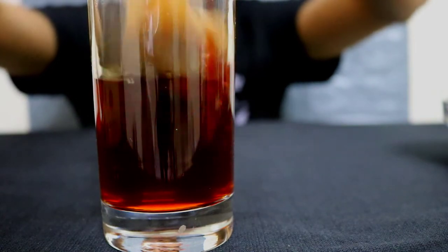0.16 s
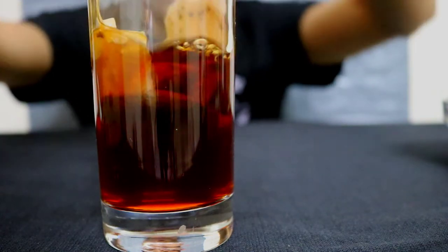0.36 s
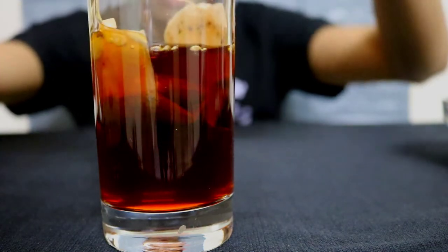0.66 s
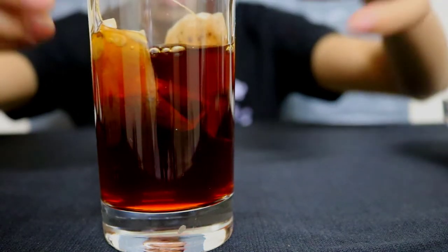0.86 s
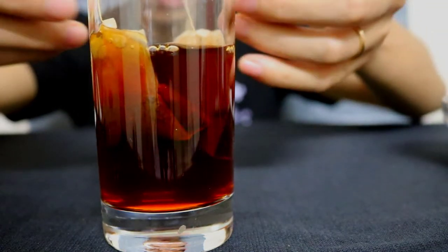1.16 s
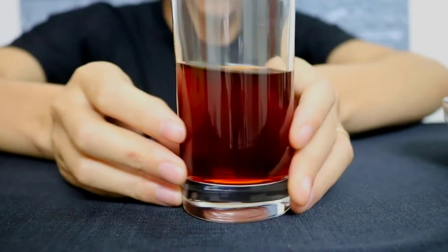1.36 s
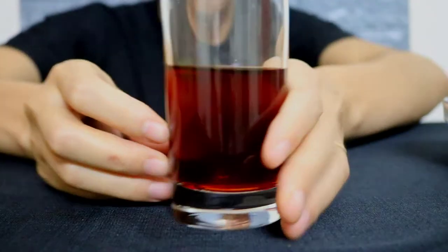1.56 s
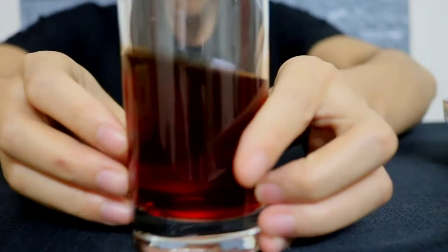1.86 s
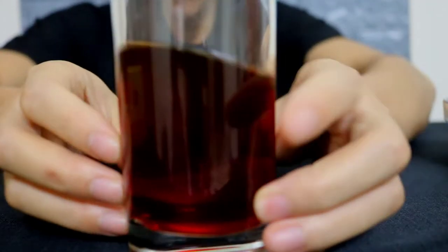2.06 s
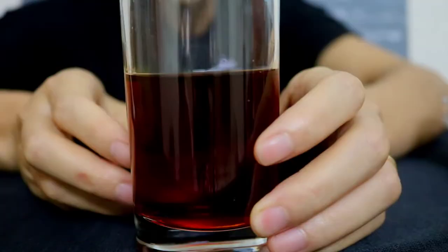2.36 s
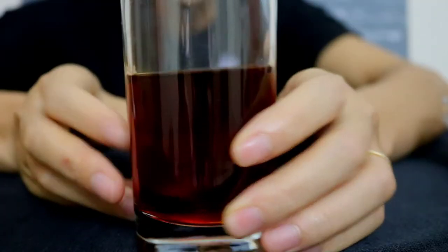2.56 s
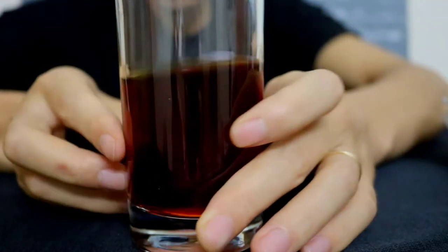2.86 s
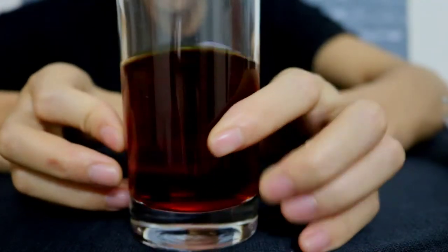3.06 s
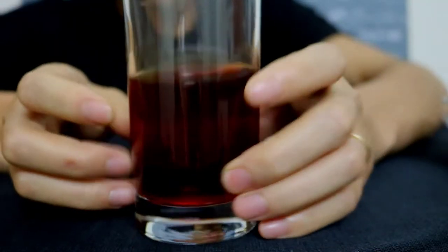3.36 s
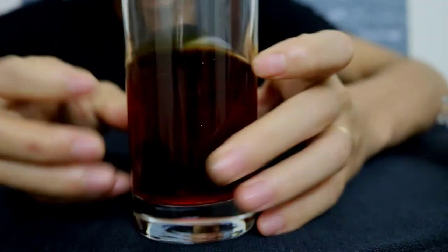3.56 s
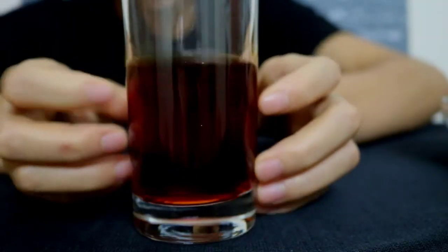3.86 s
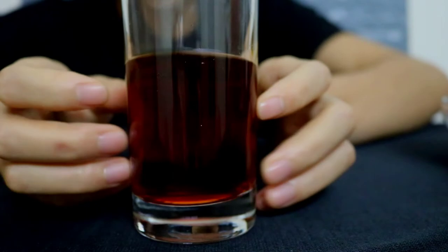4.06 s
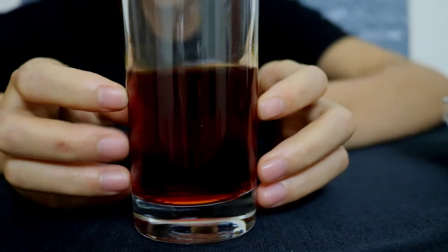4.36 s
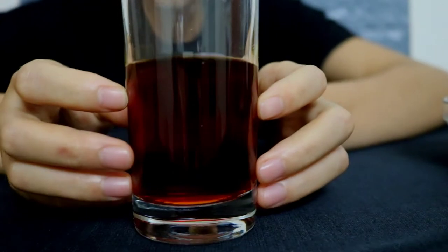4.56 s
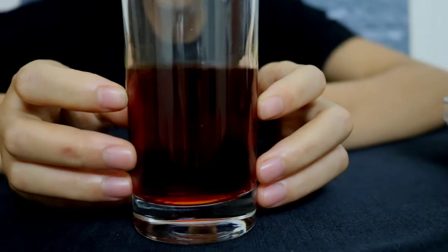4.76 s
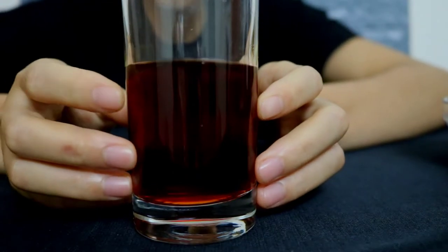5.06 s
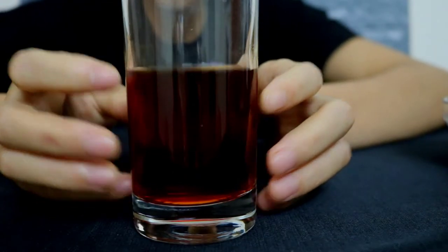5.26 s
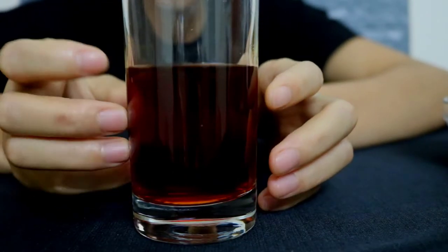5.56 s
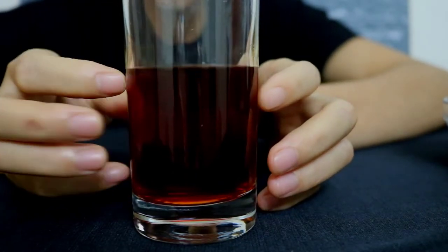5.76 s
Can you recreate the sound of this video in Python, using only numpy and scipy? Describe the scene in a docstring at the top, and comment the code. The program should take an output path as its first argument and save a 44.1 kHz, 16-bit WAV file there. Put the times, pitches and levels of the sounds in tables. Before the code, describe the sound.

Close up in a quiet kitchen, wet tea bags and fingers tick faintly against a tall full glass. The glass rubs across cloth, then one tap rings clearly. After a short total silence come soft rubbing, a heavy knock on the covered table with a cluster of glassy clinks, near quiet, and one last bright tap.

```python
"""A tall glass of tea rings as fingers tap its wall, close to the microphone in a quiet kitchen.
Each ring is a set of fading sine waves. The heavy foot knocks on a covered table: a filtered thud and low ring.
The glass slides over the cloth (dense tiny clicks); wet tea bags and fingernails tick, and soft brushes,
swells and bumps come and go (short bursts of noise). Kitchen air is filtered noise; a faint room tail follows.
The sound cuts out briefly twice and once for longer."""
import sys
import numpy as np
from scipy import signal
from scipy.fft import rfft, irfft
from scipy.io import wavfile
from scipy.ndimage import uniform_filter1d

SR = 44100
rng = np.random.default_rng(int(sys.argv[2]) if len(sys.argv) > 2 else 0)


def inscribe(sig):
    """Save sig as 16-bit PCM at rate SR to the path in sys.argv[1].

    A 1-D sig is mono; a 2-D sig holds one channel per row.
    Samples are clipped to [-1, 1] before scaling.
    """
    pcm = np.round(np.clip(np.atleast_2d(sig).T, -1, 1) * 32767)
    wavfile.write(sys.argv[1], SR, pcm.astype(np.int16))


N = 260612
TIME = np.arange(N) / SR


def undb(db):
    """Turn decibels into a gain."""
    return 10 ** (np.asarray(db) / 20)


def unit(x):
    """Scale a sound to an average (rms) level of 1."""
    return x / np.sqrt(np.mean(x ** 2))


def fader(rows):
    """Draw a gain over time through rows of (time [s], level [dB])."""
    return undb(np.interp(TIME, *np.transpose(rows)))


def fade(t, t60):
    """Natural dying away: the level falls by 60 dB in t60 seconds."""
    return np.exp(-np.log(1000) * t / t60)


def add(out, s, x):
    """Mix sound x into out, starting at time s."""
    start = max(int(round(s * SR)), 0)
    out[start:start + len(x)] += x[:max(N - start, 0)]


def colour(x, points):
    """Shape the tone through (frequency [Hz], level [dB]) points, with no sound before its cause."""
    size = 4096
    hz, db = np.transpose(points)
    freq = np.maximum(np.arange(size // 2 + 1) * SR / size, 1)
    gain = undb(np.interp(np.log(freq), np.log(hz), db))
    # folding the cepstrum gives the minimum-phase filter
    cepstrum = irfft(np.log(gain))
    cepstrum[1:size // 2] *= 2
    cepstrum[size // 2 + 1:] = 0
    response = irfft(np.exp(rfft(cepstrum)))
    return signal.fftconvolve(x, response)[:len(x)]


def band_noise(count, hz, width_hz):
    """Noise gathered around one frequency, as in a single resonance, with rms 1."""
    freq = np.maximum(np.arange(count // 2 + 1) * SR / count, 1)
    gain = 1 / (1 + ((freq ** 2 - hz ** 2) / (freq * width_hz)) ** 2)
    return unit(irfft(rfft(rng.standard_normal(count)) * gain, count))


def walk(rate):
    """Slow random wavering (rms 1): noise averaged twice over 1/rate seconds."""
    span = max(int(SR / rate), 1)
    return unit(uniform_filter1d(uniform_filter1d(rng.standard_normal(N), span), span))


# tone of the kitchen air before and after the long silence: (frequency [Hz], relative level [dB])
AIR_EARLY = [(15, -40.5), (25, -17.5), (92, -13.5), (145, -3.5), (293, 0.5), (354, -3), (887, -8),
             (988, -9), (1560, -11.5), (3720, -18.5), (11000, -18.5), (16000, -22.5)]
AIR_LATE = [(15, -54), (25, -34), (185, -3.5), (335, -1.5), (451, -7.5), (1650, -16.5), (2160, -18.5),
            (3080, -24.5), (3620, -23.5), (7110, -32), (7920, -18), (8590, -27), (16000, -27)]
# loudness of the kitchen air: (time [s], level [dB])
AIR_DB = [(0, -57.6), (2.4, -55.5), (2.8, -53), (5.9, -54.5)]
# thin whistle in the hiss: (frequency [Hz], width [Hz], level [dB])
WHISTLE = [(7970, 140, -71.5), (3720, 66, -74.5)]


def air():
    """Low room murmur under an even hiss; a thin whistle joins after the long silence."""
    early = unit(colour(rng.standard_normal(N), AIR_EARLY))
    late = unit(colour(rng.standard_normal(N), AIR_LATE))
    is_late = TIME > SILENCES[-1][0]  # the switch hides in the long silence
    waver = undb(.4 * walk(8))
    murmur = np.where(is_late, late, early) * fader(AIR_DB) * waver
    whistle = sum(undb(db) * band_noise(N, hz, width) for hz, width, db in WHISTLE)
    return murmur + whistle * is_late


ROOM_T60_S, ROOM_DB = 0.44, -13.5
# tone of the room tail: (frequency [Hz], relative level [dB])
ROOM = [(100, -3), (250, 4.5), (600, -5.5), (1500, -9), (5000, -2), (12000, -1)]


def room(x, onset_s=0.0016):
    """A faint tail from the kitchen walls, fullest in the lows and open in the treble: dying noise."""
    t = TIME[:SR // 2]
    tail = rng.standard_normal(len(t)) * fade(t, ROOM_T60_S) * (1 - np.exp(-t / onset_s))
    tail = colour(tail / np.sqrt(np.sum(tail ** 2)), ROOM)
    return undb(ROOM_DB) * signal.fftconvolve(x, tail)[:N]


def swells(rows, spread):
    """Soft sounds that rise and fade without an attack: noise under a smooth hump."""
    out = np.zeros(N)
    for s, half_length, db, hz in rows:
        count = int(2 * half_length * SR)
        hump = np.hanning(count) * band_noise(count, hz, spread * hz)
        add(out, s - half_length, undb(db) * hump)
    return out


# soft puffs of noise, light brushes and low swells of room murmur:
# (middle time [s], half length [s], level [dB], centre frequency [Hz])
PUFFS = [(.06, 0.085, -60.5, 1100), (.77, .05, -63.5, 1800), (.91, .02, -56, 10100),
         (.915, .03, -57.5, 650), (1.228, .027, -53.5, 10000), (2.048, 0.049, -52.5, 2320),
         (2.29, .12, -55.5, 520), (3.3, 0.079, -52, 1500), (5.25, .12, -53.5, 280),
         (5.758, .028, -55.5, 2800)]


def puffs():
    """Soft puffs of broad noise: light brushes and low swells of room murmur."""
    return swells(PUFFS, spread=1.33)


# arms leaning on the table: (middle time [s], level [dB], centre frequency [Hz])
LEANS = [(.25, -63, 45), (.82, -64.5, 48), (4.45, -57, 107)]
LEAN_HALF_S = 0.095
# soft low bumps of finger pads and the table: (middle time [s], level [dB])
SOFT_BUMPS = [(.19, -51), (1.73, -55), (1.79, -57.5), (1.98, -54.5), (2.972, -57), (3.47, -58), (3.59, -58),
              (4.895, -57), (5.331, -56), (5.6, -54)]
SOFT_BUMP_HZ, SOFT_BUMP_HALF_S = 142, .024
# the table sways for a moment after each tap's thump (dB against the thump)
SWAY_DB, SWAY_HZ, SWAY_HALF_S, SWAY_LAG_S = -29, 135, .019, .012


def bumps():
    """Dull low bumps: arms lean, finger pads and the table bump softly, the table sways after each tap."""
    leans = [(s, LEAN_HALF_S, db, hz) for s, db, hz in LEANS]
    soft = [(s, SOFT_BUMP_HALF_S, db, SOFT_BUMP_HZ) for s, db in SOFT_BUMPS]
    sways = [(s + SWAY_LAG_S, SWAY_HALF_S, thump_db + SWAY_DB, SWAY_HZ) for s, *_, thump_db in TAPS]
    return swells(leans + soft + sways, spread=0.58)


# tone of the sliding tablecloth: (frequency [Hz], relative level [dB])
CLOTH = [(59, -40), (100, -20), (229, -5.5), (365, -11.5), (502, -3), (1060, -10), (1680, -4), (1830, -6.5),
         (6700, -8), (12700, -14), (16000, -40.5)]
# pushes and turns of the glass on the cloth: (start time [s], hold until [s], level [dB])
STROKES = [(1.256, 1.33, -57.5), (1.4, 1.555, -45.2), (1.829, 1.87, -60), (2.75, 3.13, -58.5),
           (3.24, 3.436, -61), (3.49, 3.68, -56.8), (3.736, 3.88, -61), (5.267, 5.37, -62)]
STROKE_ATTACK_S, STROKE_RELEASE_S = .055, .115
# a faint, steady, cloth-coloured hiss lies under everything from here on
HISS_FROM_S, HISS_DB = 1.28, -66


def sliding():
    """Threads of the cloth catch and slip under the foot: very dense tiny clicks, over a faint steady hiss."""
    # slips differ slightly in strength, so the rub stays smooth
    slips = rng.standard_normal(N) * undb(1.1 * rng.exponential(size=N))
    rub = unit(colour(slips, CLOTH))
    judder = undb(.5 * walk(70))  # slightly uneven speed
    strokes = []
    for start, end, db in STROKES:
        gather = (TIME - start) / STROKE_ATTACK_S
        ease_off = 1 - (TIME - end) / STROKE_RELEASE_S
        strokes.append(undb(db) * np.clip(np.minimum(gather, ease_off), 0, 1))
    speed = np.max(strokes, axis=0)
    hiss = undb(HISS_DB) * (TIME > HISS_FROM_S)
    return rub * judder * (speed + hiss)


# short ticks, and one faint high glass ping at .179 s:
# (time [s], starting level [dB], centre frequency [Hz], time to fall 60 dB [s])
TICKS = [(.066, -37, 12300, .0055), (.072, -52, 7500, .012), (.101, -42.5, 11000, .048),
         (.179, -53, 8950, .072), (.29, -51, 11300, .04), (.987, -43.5, 1870, 0.011),
         (1.115, -36.5, 9100, .013), (1.116, -39, 1910, 0.016)]
# every tap starts with a click, just before the wall speaks
CLICK_HZ, CLICK_T60_S, CLICK_LEAD_S = 5500, 0.0093, .0007
# the heavy foot adds a hollow clack (dB against the thump)
CLACK_DB, CLACK_HZ, CLACK_T60_S = -19, 950, .04


def ticks(spread=1.0):
    """Ticks of wet paper and fingernails, a faint glass ping, each tap's click and clack: fast-dying noise."""
    out, t = np.zeros(N), TIME[:SR // 5]
    clicks = [(s - CLICK_LEAD_S, click_db, CLICK_HZ, CLICK_T60_S) for s, *_, click_db, thump_db in TAPS]
    clacks = [(s, thump_db + CLACK_DB, CLACK_HZ, CLACK_T60_S) for s, *_, thump_db in TAPS]
    for s, db, hz, t60 in TICKS + clicks + clacks:
        add(out, s, undb(db) * band_noise(len(t), hz, spread * hz) * fade(t, t60))
    return out


# knocks of the foot on the table:
# (time [s], level before cushioning [dB], contact corner [Hz], share of the low ring [dB])
KNOCKS = [(.576, -49, 1500, -11), (.905, -39, 900, 7), (1.115, -28, 1600, -14), (3.732, -6.5, 360, 8),
          (3.775, -21, 350, 10), (3.7969, -21, 350, 15), (4.1367, 1.5, 680, -10)]
# tone of the covered table's dead thud: (frequency [Hz], relative level [dB])
THUD = [(30, -59.5), (70, -21.5), (130, -5.5), (240, -1), (500, -3.5), (850, -10), (1200, -25),
        (1600, -14.5), (2600, -24.5), (8000, -27)]
# ringing modes of the table: (frequency [Hz], time to fall 60 dB [s], level [dB])
TABLE = [(129, 0.1, -32.5), (207, .07, -35), (239.4, 0.12, -29), (367, 0.054, -36.5)]
# every tap also thumps down through the foot; the louder its click, the harder the contact
THUMP_RING_DB, THUMP_CORNER_HZ = 12, 1100  # the corner holds at the reference click level below
THUMP_CLICK_DB, CLICK_DB_PER_OCTAVE = -36, 28


def knocks():
    """The foot pushes the table, in knocks and under taps: a thud and short low ring, duller if soft."""
    out, t = np.zeros(N), TIME[:SR // 3]
    thud = colour(1. * (t == 0), THUD)  # one sharp push, coloured by the table
    thud /= np.abs(thud).max()
    ring = sum(undb(db) * fade(t, t60) * np.cos(2 * np.pi * hz * t) for hz, t60, db in TABLE)
    thumps = []
    for s, *_, click_db, thump_db in TAPS:
        octaves = (click_db - THUMP_CLICK_DB) / CLICK_DB_PER_OCTAVE
        thumps.append((s, thump_db, THUMP_CORNER_HZ * 2 ** octaves, THUMP_RING_DB))
    for s, db, corner_hz, ring_db in KNOCKS + thumps:
        cushion = signal.butter(1, min(corner_hz, SR / 4), fs=SR)  # soft contact dulls the top
        push = signal.lfilter(*cushion, thud + undb(ring_db) * ring)
        add(out, s, -undb(db) * push)
    return out


# wall modes of the filled glass, by frequency [Hz]:
# (time to fall 60 dB [s], level struck at spot a [dB], at spot b [dB], at spot c [dB])
GLASS = {1600: (0.04, -22, -42, -53), 1916: (0.79, -21.5, -29.5, -39), 1926: (0.8, -41, -61, -26.5),
         2102: (0.3, -57, -52, -51), 4510: (0.78, -54, -60, -58), 4637: (0.2048, -55, -21, -65),
         4700: (0.23, -36.5, -29, -27.5), 4742: (0.1459, -21.5, -64, -25), 6243: (.1, -16.5, -25, -25),
         6275: (0.02, -43.5, -54, -55), 8800: (0.05, -42, -62, -66), 8887: (0.14, -53.5, -52, -58),
         9245: (.06, -24, -32, -45), 9313: (0.15, -37.5, -55, -68), 10062: (0.1447, -46, -72, -60),
         10173: (0.1833, -36.5, -62, -63), 10698: (0.104, -28, -35, -43), 11400: (.04, -43, -53, -50),
         12070: (0.11, -35, -37, -54), 13150: (.17, -71.5, -47, -66), 13305: (.17, -68, -43, -68),
         13562: (.14, -64.5, -61, -43.5), 13630: (0.3134, -52.5, -56, -78), 15020: (.1, -72.5, -49, -71)}
SPOTS = "abc"
# taps on the wall: (time [s], spot, strength [dB], brightness [dB per octave],
# detune at the longest ring [Hz], finger damping [dB per s, negative counts as none],
# click level [dB], thump level before cushioning [dB])
TAPS = [(.177, "c", -25.5, -5.5, -52, 450, -64, -34), (.987, "c", -25, -13, -52, 205, -55, -40),
        (1.9045, "a", 2, .2, 0, 4, -20, -18), (3.7314, "c", -27.5, 3.5, 7, 32, -48, -33),
        (3.7965, "c", -16.5, 4.5, 6.5, -3, -47, -26.5), (3.876, "b", 1.5, 0, 3, 23, -36, -23),
        (4.033, "c", -3, 4, -1.5, 88, -32.5, -20.5), (4.1364, "b", -13, .5, 4.5, 79, -35, -19),
        (4.217, "c", -6.5, 0, 2, 55, -43, -24.5), (5.718, "c", 2.3, .4, -1, 100, -42, -20)]


def glass(attack_s=0.00052):
    """Taps ring the wall; the spot picks which mode of a split pair speaks, the grip shortens the ring."""
    out, t = np.zeros(N), TIME[:SR]
    hz = np.array(list(GLASS))
    t60, *spot_db = np.transpose(list(GLASS.values()))
    longest = hz[np.argmax(t60)]  # the long ring of the oval rim mode
    for s, spot, db, bright_db, detune, damping, *_ in TAPS:
        tilt_db = bright_db * np.log2(hz / longest)
        gain = undb(spot_db[SPOTS.index(spot)] + db + tilt_db)
        tuned = hz + detune * np.sqrt(hz / longest)  # more tea against the wall lowers the pitch
        decay = np.log(1000) / t60 + max(damping, 0) * np.log(10) / 20
        modes = np.exp(-np.outer(decay, t)) * np.sin(2 * np.pi * np.outer(tuned, t))
        add(out, s, (gain @ modes) * (1 - np.exp(-t / attack_s)))
    return out


def scene(knock_send_db=-7):
    """Glass, table and hands close up; the glass rings freely into the room, the cloth muffles the knocks."""
    ringing = glass() + ticks() + sliding() + puffs()
    muffled = knocks() + bumps()
    tail = room(ringing + undb(knock_send_db) * muffled)
    return (ringing + muffled + tail + air())[None]


# silent stretches: (start time [s], end time [s])
SILENCES = [(1.271, 1.291), (2.338, 2.356), (2.371, 2.792)]
TOP_HZ = 16000


def record(dry):
    """The sound drops out in the silent stretches, and everything above TOP_HZ is steeply cut."""
    live = 1. - sum((TIME > start) & (TIME < end) for start, end in SILENCES)
    live = uniform_filter1d(live, size=256)  # short ramps at the edges
    top_cut = signal.ellip(10, .2, 80, TOP_HZ, fs=SR, output="sos")
    return signal.sosfilt(top_cut, dry * live)


dry = scene()
out = record(dry)
inscribe(out)
```